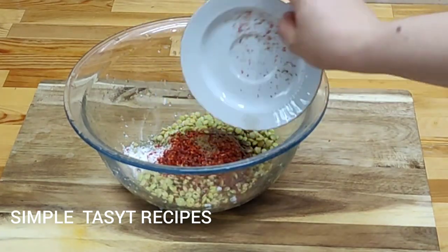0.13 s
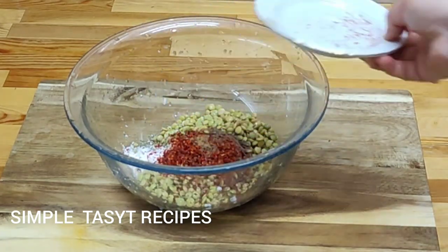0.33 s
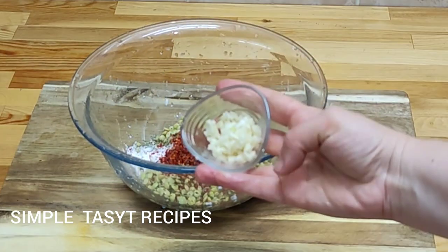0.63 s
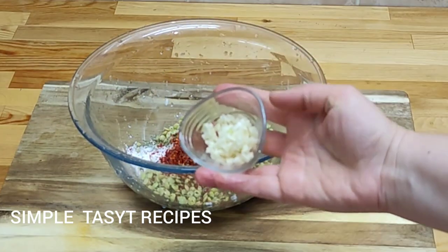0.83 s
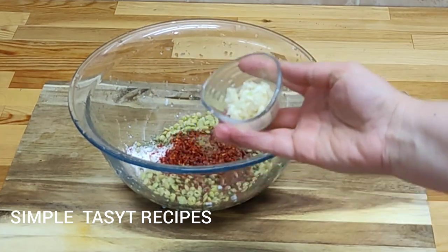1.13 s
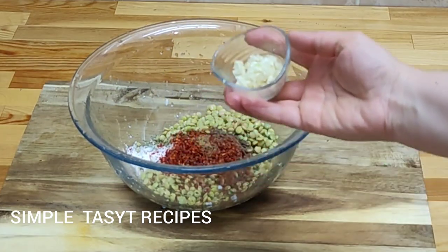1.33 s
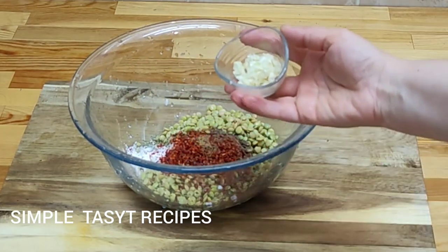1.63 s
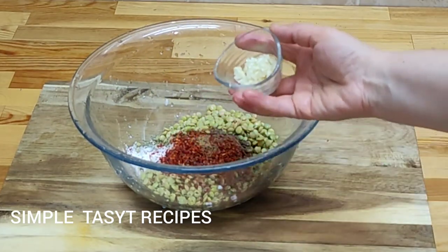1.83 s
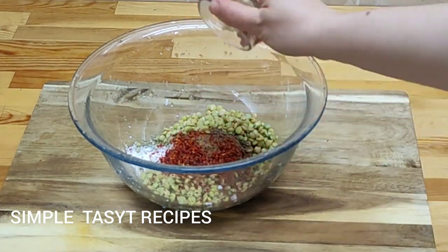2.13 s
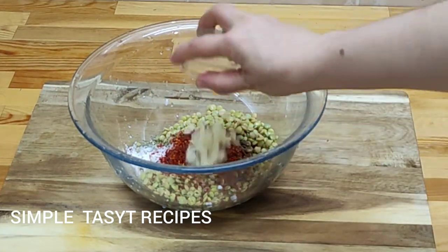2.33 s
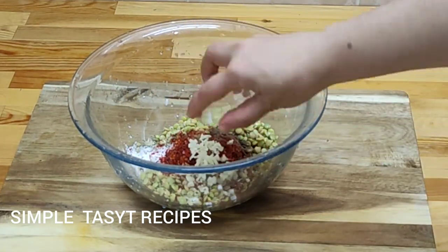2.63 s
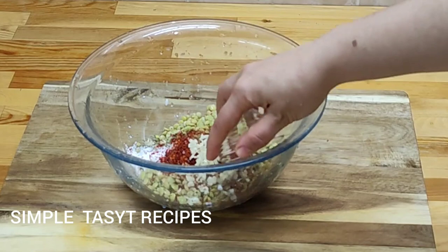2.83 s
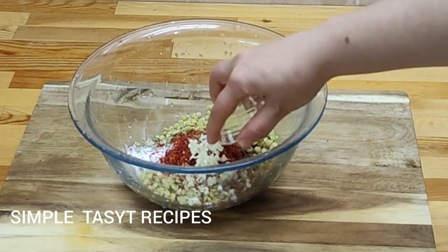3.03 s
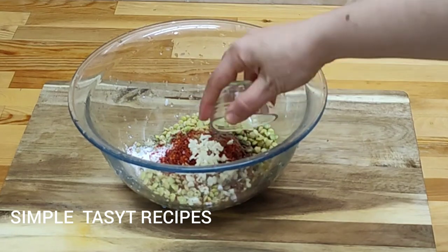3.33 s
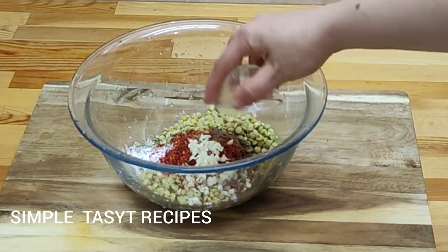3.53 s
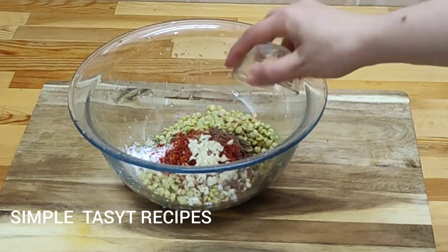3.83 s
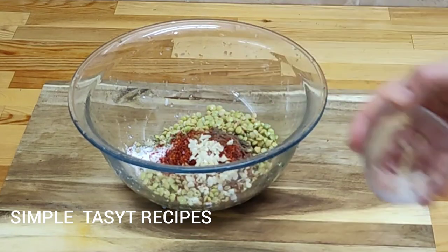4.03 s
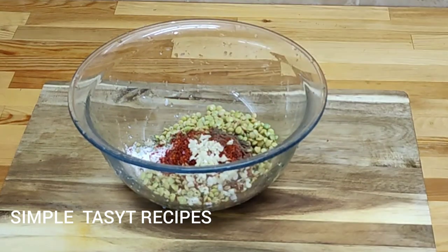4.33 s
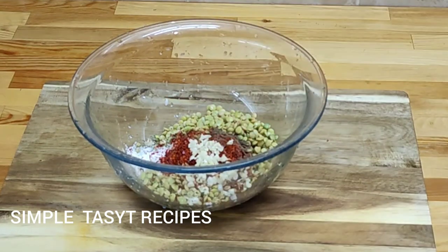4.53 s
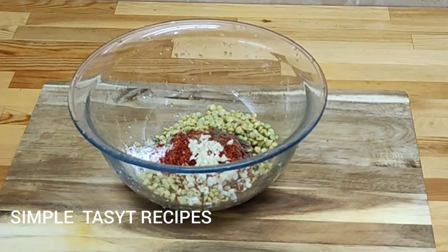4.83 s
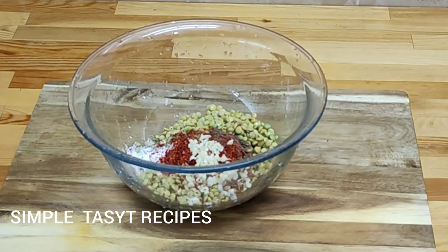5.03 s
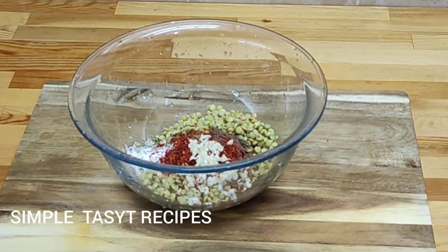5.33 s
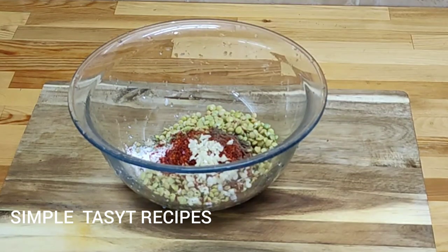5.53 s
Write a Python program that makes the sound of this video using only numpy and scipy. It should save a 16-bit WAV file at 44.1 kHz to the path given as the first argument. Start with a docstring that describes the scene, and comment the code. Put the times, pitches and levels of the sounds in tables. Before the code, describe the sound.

A kitchen with short, lively echoes, heard in stereo close to a large glass bowl. At 0 s the bowl is still ringing from an earlier tap; at about 0.06 s a plate hits its rim with a hard crack and a loud, clear glassy ring whose close paired tones beat. It stops dead at about 0.6 s, with a tiny dip in the background and a faint tick. Then only soft room air and a faint, slightly wavering low appliance hum remain, with minute dry ticks until about 1.2 s. At 2.9 s a small glass cup touches the bowl: a brighter, thinner clink with a sharp contact and sparkling decay of about half a second. Soft, dull low thuds cluster at 3.2-3.4 s under its tail. Quiet hum follows. At about 5.3 and 5.4 s come two hollow wooden knocks, the second with a stronger low room boom, fading to the end at about 5.7 s.

```python
"""Glass bowl taps in a kitchen

A large glass bowl is heard ringing, then a plate and later a small glass cup touch its rim: decaying sines,
in beating pairs for the bowl, plus filtered contact cracks. The first ring stops dead.
Soft thuds and two knocks are filtered clicks in an echoing room; faint ticks, filtered-noise air and a hum
lie around them. Gain control ducks under loud taps.
"""
import sys
import numpy as np
from scipy import signal
from scipy.fft import rfft, irfft
from scipy.io import wavfile

SR = 44100
rng = np.random.default_rng(int(sys.argv[2]) if len(sys.argv) > 2 else 0)


def master_out(mix):
    """Clip the mix to full scale and print it as 16-bit PCM to the path in sys.argv[1]."""
    frames = np.transpose(np.atleast_2d(mix))
    ceiling = np.clip(frames, -1, 1)
    pcm = np.round(ceiling * 32767).astype(np.int16)
    wavfile.write(sys.argv[1], SR, pcm)


N = 250047
CUT_S, GAP_S = 0.5961, 0.0064


def amp(db):
    """dB to linear gain."""
    return 10 ** (np.asarray(db) / 20)


def rms_one(x):
    """Scale to unit rms."""
    return x / np.sqrt(np.mean(x ** 2) + 1e-20)


def at_hz(points, hz):
    """Interpolate a (frequency, value) table over log frequency."""
    table_hz, values = np.array(points).T
    return np.interp(np.log(hz), np.log(table_hz), values)


def colour(x, points):
    """Minimum-phase filter with the given dB curve: no pre-ringing."""
    size = 4096
    hz = np.maximum(np.fft.rfftfreq(size, 1 / SR), 1)
    cepstrum = irfft(np.log(amp(at_hz(points, hz))))
    # fold the cepstrum to its causal half
    cepstrum[1:size // 2] *= 2
    cepstrum[size // 2:] = 0
    impulse = irfft(np.exp(rfft(cepstrum)))
    return signal.fftconvolve(x, impulse)[:N]


def clicks(rows):
    """Single-sample impulses at (time [s], level [dB]); times before the start land on sample 0."""
    out = np.zeros(N)
    for start_s, db in rows:
        out[int(np.clip(start_s * SR, 0, N - 1))] += amp(db)
    return out


def resonate(x, hz, width_hz):
    """Two-pole resonance, about unit gain at its peak."""
    r = np.exp(-np.pi * width_hz / SR)
    numerator = [(1 - r * r) / 2, 0, (r * r - 1) / 2]
    denominator = [1, -2 * r * np.cos(2 * np.pi * hz / SR), r * r]
    return signal.lfilter(numerator, denominator, x)


def ring(since_s, hz, t60_s, lag_rad=0):
    """Struck mode: a sine that decays exponentially from the blow."""
    since_s = np.maximum(since_s, 0)
    decay = amp(-60 * since_s / t60_s) * (since_s > 0)
    return np.sin(2 * np.pi * hz * since_s - lag_rad) * decay


# left-right likeness of diffuse sound: (frequency [Hz], likeness [0..1])
STEREO_LIKENESS = [(60, 0.17), (180, 1), (550, 0.18), (1650, 0), (4970, -0.0), (15000, 0.0013)]
EDGES_HZ = 30 * 2 ** np.arange(0, 9.1, 0.5)


def stereo_bands(length):
    """Half-octave noise bands whose mid-side balance sets the left-right likeness."""
    white = rng.standard_normal((2, 2, length))
    for k, (low_hz, high_hz) in enumerate(zip(EDGES_HZ, EDGES_HZ[1:])):
        band_pass = signal.butter(2, [low_hz, high_hz], "band", fs=SR, output="sos")
        mid, side = signal.sosfilt(band_pass, white[k % 2])
        hz = np.sqrt(low_hz * high_hz)
        alike = np.clip(at_hz(STEREO_LIKENESS, hz), -1, 1)
        yield hz, np.sqrt(1 + alike) * mid + np.sqrt(1 - alike) * side * [[1], [-1]]


# rough motor bands: (frequency [Hz], width per filter pass [Hz], rms before balance [dB])
HUM_BANDS = [(137.6, 37, -66), (206, 14, -71.5), (296, 9.7, -71.5), (507, 19, -76.5)]
HUM_HZ, HUM_DB = 199.3, -50.5
HUM_WAVER_DB, HUM_WAVER_HZ = 1.3, 0.5   # rms


def hum():
    """Appliance motor: a tone wavering in level and pitch, plus noise passed twice through resonances."""
    white = rng.standard_normal((4, N + SR))   # the first second settles the filters
    both = white[0] + 0.13 * white[1] * [[1], [-1]]
    bands = 0
    for hz, width_hz, db in HUM_BANDS:
        band = resonate(resonate(both, hz, width_hz), hz, width_hz)
        bands = bands + amp(db) * rms_one(band[:, SR:])
    r = np.exp(-2 * np.pi * 2.4 / SR)   # waver corner 2.4 Hz
    level, pitch = (rms_one(signal.lfilter([1], [1, -2 * r, r * r], w)[SR:]) for w in white[2:])
    phase = 2 * np.pi * np.cumsum(HUM_HZ + HUM_WAVER_HZ * pitch) / SR
    tone = amp(HUM_DB + HUM_WAVER_DB * level) * np.sin(phase + np.array([[0], [0.2]]))
    return (bands + tone) * amp([[-0.7], [0.7]])


# air noise spectrum: (frequency [Hz], relative density [dB per Hz])
AIR_SPECTRUM = [(20, 1), (60, -8), (110, -7.5), (260, 3), (500, -6.5), (1130, -16), (3000, -24),
                (7200, -40), (11500, -33), (14000, -29.5)]
# slow air level: (time [s], 600-4000 Hz level [dB], level above 4000 Hz [dB])
AIR_STIR = [(0, -2.5, -4.5), (0.351, -2.5, 1), (0.452, -0.5, 7.5), (0.591, -1.5, 7), (.62, -3, 1.5),
            (1.15, 0, 0), (1.501, -3, 0.5), (4.298, -2, 0.5), (5.67, -3.5, -0.5)]
AIR_RMS_DB = -60.5


def air():
    """Broad room noise whose middle and treble levels drift."""
    time_s, middle_db, treble_db = np.transpose(AIR_STIR)
    t = np.arange(N) / SR
    middle = np.interp(t, time_s, middle_db)
    treble = np.interp(t, time_s, treble_db)
    total = 0
    for hz, band in stereo_bands(N):
        band_db = at_hz(AIR_SPECTRUM, hz) + middle * (600 < hz < 4000) + treble * (hz > 4000)
        total = total + amp(band_db) * band
    return amp(AIR_RMS_DB) * rms_one(total)


# faint ticks: (time [s], level [dB], frequency [Hz])
FAINT_TICKS = [(0.615, -47.5, 3920), (.7505, -59, 10500), (.7765, -60, 11500), (0.7944, -64, 5970),
               (0.8864, -65, 12300), (1.194, -53, 12000)]
TICK_T60_S = 0.0027


def ticks():
    """Faint dry ticks: very short decaying sines."""
    t = np.arange(N) / SR
    return sum(amp(db) * ring(t - start_s, hz, TICK_T60_S) for start_s, db, hz in FAINT_TICKS)


# room decay: (frequency [Hz], t60 [s])
ROOM_DECAY = [(100, 0.83), (300, 0.87), (700, 0.46), (1800, .41), (5000, 0.34), (14000, 0.074)]
ECHO_S, ECHO_DB, ECHO_T60_S = 0.031, -6, 0.025   # far wall's answer
LUMPY_DB, LUMP_S, SMOOTH_AFTER_S = 3, 0.003, 0.08   # early echoes bunch, later ones blend


def kitchen(x, fill_s, longer=1):
    """Diffuse echoes: noise that builds up, swells at the far wall's answer and dies band by band."""
    t = np.arange(SR) / SR
    tail = 0
    for hz, band in stereo_bands(SR):
        tail = tail + band * amp(-60 * t / (longer * at_hz(ROOM_DECAY, hz)))
    far_wall = amp(ECHO_DB - 60 * np.maximum(t - ECHO_S, 0) / ECHO_T60_S) * (t > ECHO_S)
    tail = tail * (1 - np.exp(-t / max(fill_s, 1e-4))) * (1 + far_wall)
    bunches = np.interp(t / LUMP_S, np.arange(1000), rng.standard_normal(1000))
    tail = tail * amp(LUMPY_DB * bunches * np.exp(-t / SMOOTH_AFTER_S))
    return signal.fftconvolve(x[None], rms_one(tail) / np.sqrt(SR), axes=1)[:, :N]


# knocks: (time [s], relative level [dB], room boom level [dB])
KNOCK_HITS = [(5.285, -6, -33), (5.390, -5, -25)]
# knock contact spectrum: (frequency [Hz], level [dB])
KNOCK_SPECTRUM = [(20, -47), (60, -30), (140, -33.5), (400, -6.5), (1100, 1), (2500, -19.5), (3200, -24),
                  (6000, -37.5), (10000, -37.5), (15000, -40)]
# hollow wooden body: (frequency [Hz], width [Hz], relative level [dB])
KNOCKED_BODY = [(137, 16, 7.5), (345, 56, -10), (611.5, 31, -11), (720, 14, -11.5), (1035, 21, -15),
                (1420, 14, -13), (1823, 43, -17.5), (2055, 21, -18), (2324, 36, -17)]
# soft thuds: (time [s], relative level [dB])
THUD_HITS = [(3.213, -39), (3.241, -33), (3.32, -37.5), (3.36, -43.5), (3.415, -48)]
# thud spectrum: (frequency [Hz], level [dB])
THUD_SPECTRUM = [(20, -61), (60, -30), (130, 8.5), (300, -7), (800, -17), (1500, -29), (15000, -100)]
BOOM_HZ, BOOM_T60_S, BOOM_RISE_S = 136.8, 0.38, 0.03


def far_blows():
    """Knocks on a resonant hollow body and filtered thuds, with room echoes; a room mode booms after knocks."""
    t = np.arange(N) / SR
    knock = colour(clicks([row[:2] for row in KNOCK_HITS]), KNOCK_SPECTRUM)
    body = sum(amp(db) * resonate(knock, hz, width_hz) for hz, width_hz, db in KNOCKED_BODY)
    blows = amp(22) * knock + amp(44) * body
    thuds = amp(34.5) * colour(clicks(THUD_HITS), THUD_SPECTRUM)
    boom = 0
    for start_s, _, boom_db in KNOCK_HITS:
        rise = 1 - np.exp(-np.abs(t - start_s) / BOOM_RISE_S)
        boom = boom + amp(boom_db) * ring(t - start_s, BOOM_HZ, BOOM_T60_S) * rise
    direct = amp(-16.5) * blows + amp(-1) * thuds
    return direct + kitchen(blows + thuds, fill_s=0.0015, longer=1.003) + boom


# rim taps, the first before the start: (time [s], relative crack level [dB], ring level [dB],
# hardness [dB per kHz], second twin level [dB], wall mode level [dB], beat time already run [s])
RIM_TAPS = [(-.1, -62.5, -14.5, 4.7, -3.5, -29, 0.076), (.062, -4.5, -0.53, 1.35, 0.8, -21, 0.078),
            (2.879, -3, -14, 6, 7.5, -11.5, -0.015)]
# ring modes, adjacent rows are twins: frequency [Hz]
RING_HZ = [512.0, 511.0, 1344.7, 1339.4, 2460.0, 2449.5, 3837.0, 3846.0, 5372.0, 5394.0]
# same order: (level [dB], t60 [s], left minus right [dB], right polarity [+1 or -1])
RING_MODES = [(-18, 0.46, 3, 1), (-36.5, 1.6, -12.5, -1), (-10.5, 0.85, 8.5, 1), (-16, 0.42, -10.5, 1),
              (-13.5, 0.49, 3, 1), (-39.5, 0.73, 1.5, 1), (-12, 0.18, -2.5, 1), (-25.5, 0.36, 3, 1),
              (-37, 0.3, 1, 1), (-37, 0.16, 3, 1)]
# wall modes: frequency [Hz]
WALL_HZ = [6137, 6385, 7056, 7144, 7445, 8247, 8812, 8872, 9717, 9981, 10582, 10795, 11490, 12232, 13350,
           14010]
# same order: (relative level [dB], t60 [s])
WALL_MODES = [(-21, 0.24), (-12.5, .2), (-16.5, 0.22), (-20.5, 0.24), (-21, 0.18), (-29, 0.12),
              (-16.5, 0.2), (-19, .22), (-24.5, .2), (-21.5, 0.13), (-17, 0.26), (-25.5, 0.15), (-19, .16),
              (-22, .19), (-19.5, .2), (-20, .18)]
BUILD_UP_S, RIGHT_LAG_RAD = 0.0061, 1.0
WALL_SPLIT_HZ, WALL_SPREAD_DB = 55, 3


def bowl():
    """Glass bowl: beating twin ring modes, each tap entering the beat at its own point; a touch ends a ring."""
    t = np.arange(N) / SR
    pairs, wall = np.zeros((2, N)), np.zeros((2, N))
    ends_s = [RIM_TAPS[1][0], CUT_S, RIM_TAPS[2][0] + 1.2]
    for tap, end_s in zip(RIM_TAPS, ends_s):
        start_s, _, ring_db, hard_db_per_khz, twin_db, wall_db, beat_s = tap
        span = slice(int(max(start_s, 0) * SR), int(end_s * SR))
        since_s = t[span] - start_s
        swell = 1 - 0.87 * np.exp(-since_s / BUILD_UP_S)   # near reflections add to a held tone
        for k, (hz, (db, t60_s, pan_db, polarity)) in enumerate(zip(RING_HZ, RING_MODES)):
            second = k % 2
            struck_db = ring_db + hard_db_per_khz * hz / 1000 + twin_db * second
            strength = (-1) ** k * amp(db + struck_db) * swell
            lag = 2 * np.pi * (RING_HZ[k - second] - hz) * beat_s
            right_lag = lag + RIGHT_LAG_RAD * (1 - second)
            left = amp(pan_db / 2) * ring(since_s, hz, t60_s, lag)
            right = amp(-pan_db / 2) * ring(since_s, hz, t60_s, right_lag) * np.sign(polarity)
            pairs[0, span] += strength * left
            pairs[1, span] += strength * right
        short = slice(span.start, min(span.stop, int((start_s + 0.5) * SR)))
        for hz, (db, t60_s) in zip(WALL_HZ, WALL_MODES):
            # cluster of three, mixed differently on each side
            near_hz = hz + WALL_SPLIT_HZ * rng.uniform(-0.48, 1, (3, 1)) * [[0], [1], [1]]
            mix_db = rng.normal(0, WALL_SPREAD_DB, (2, 3)) - [0, 5, 5]
            mix = rng.choice([-1, 1], (2, 3)) * amp(mix_db)
            wall[:, short] += amp(db + wall_db) * mix @ ring(t[short] - start_s, near_hz, t60_s)
    return pairs, wall


# partials at the plate's touch, plate tones and short-lived bowl partials: frequency [Hz]
PLATE_TOUCH_HZ = [312, 438, 592, 1370, 1505, 1787, 2560, 3885, 5803]
# same order: (relative level [dB], t60 [s])
PLATE_TOUCH = [(-46, 0.32), (-48.5, .35), (-37.5, .3), (-24, 0.15), (-35, 0.26), (-41, 0.28), (-32.5, 0.1),
               (-25, .16), (-34, 0.09)]
# partials at the cup's touch, cup tones and short-lived bowl partials: frequency [Hz]
CUP_TOUCH_HZ = [856, 1857, 2452, 2587, 3200, 3555, 3819, 5352, 6675, 7862, 8170, 9240, 11290, 11750, 13710,
                14220]
# same order: (relative level [dB], t60 [s])
CUP_TOUCH = [(-43.5, .4), (-42.5, 0.3), (-26, 0.54), (-27.5, 0.22), (-30, 0.022), (-32.5, 0.52),
             (-15.5, 0.2), (-26.5, 0.16), (-34.5, .2), (-32.5, 0.1), (-36, 0.13), (-42, .12), (-36.5, 0.15),
             (-42.5, .2), (-38, .2), (-37, .1)]
# contact crack spectrum: (frequency [Hz], level [dB])
CRACK_SPECTRUM = [(20, -53.5), (100, -32.5), (300, -11.5), (700, -8.5), (1500, -0.5), (3000, -6),
                  (4200, -4), (4600, -23), (6000, -29), (10000, -29), (15000, -29)]
# duller plate contact: (frequency [Hz], gain [dB])
PLATE_CONTACT = [(20, 4.5), (3800, -3), (4600, -6.5), (7000, -4), (15000, -2)]


def touch(start_s, partials_hz, partials):
    """Partials set off by one touch: a sum of decaying sines."""
    t = np.arange(N) / SR
    return sum(amp(db) * ring(t - start_s, hz, t60_s) for hz, (db, t60_s) in zip(partials_hz, partials))


def taps():
    """Bowl ring, touch partials and contact cracks with room echoes; silent from CUT_S to just before the cup."""
    t = np.arange(N) / SR
    pairs, wall = bowl()
    plate_touch = touch(RIM_TAPS[1][0], PLATE_TOUCH_HZ, PLATE_TOUCH)
    cup_touch = touch(RIM_TAPS[2][0], CUP_TOUCH_HZ, CUP_TOUCH)
    plate_contacts = colour(clicks([row[:2] for row in RIM_TAPS[:2]]), PLATE_CONTACT)
    crack = colour(plate_contacts + clicks([RIM_TAPS[2][:2]]), CRACK_SPECTRUM)
    short = wall + plate_touch + cup_touch
    to_room = amp(-2.5) * short[0] + amp(22.5) * crack + amp(-17) * pairs.mean(axis=0)
    direct = pairs + amp(-6) * short + amp(12.5) * crack
    heard = direct + kitchen(to_room, fill_s=0.004)
    # keep the taps free of low thumps
    heard = signal.sosfilt(signal.butter(2, 110, "high", fs=SR, output="sos"), heard)
    return heard * ((t < CUT_S) | (t > RIM_TAPS[2][0] - 0.01))


def scene():
    """Mix all layers; air and hum dip briefly as the first ring stops."""
    t = np.arange(N) / SR
    gap = np.where((t > CUT_S) & (t < CUT_S + GAP_S), amp(-12.5), 1)
    return taps() + far_blows() + ticks() + gap * (air() + hum())


def record(dry, threshold_db=-20, slope=0.26, release_db_per_s=45, attack_hz=150):
    """Gain control with fast attack and slow release, then treble and bass roll-off and a steep cut."""
    ramp = release_db_per_s * np.arange(N) / SR
    peak_db = 20 * np.log10(np.abs(dry).max(axis=0) + 1e-9)
    level_db = np.maximum.accumulate(peak_db + ramp) - ramp   # falls at the release rate
    r = np.exp(-2 * np.pi * attack_hz / SR)
    target_db = -np.clip(slope, 0, 1) * np.maximum(level_db - threshold_db, 0)
    duck_db = signal.lfilter([1 - r], [1, -r], target_db)
    out = signal.sosfilt(signal.cheby1(12, 1, 14400, fs=SR, output="sos"), dry * amp(duck_db))
    out = signal.sosfilt(signal.butter(2, 60, "high", fs=SR, output="sos"), out)
    return signal.sosfilt(signal.cheby2(12, 60, 15500, fs=SR, output="sos"), out)


dry = scene()
out = record(dry)
master_out(out)
```